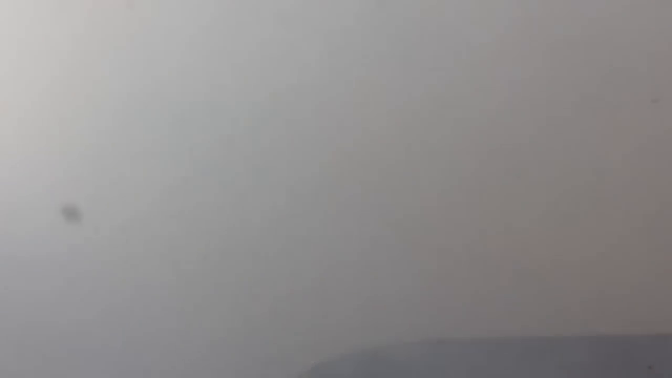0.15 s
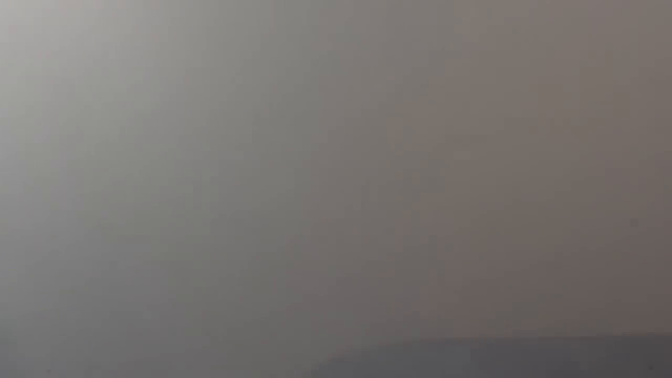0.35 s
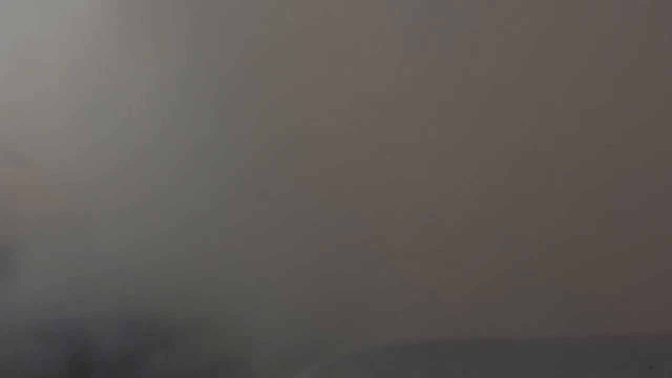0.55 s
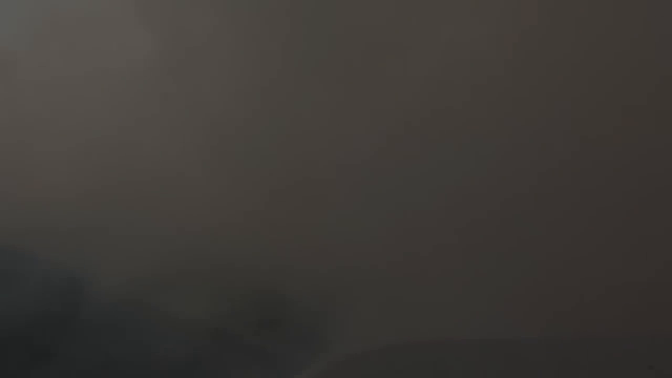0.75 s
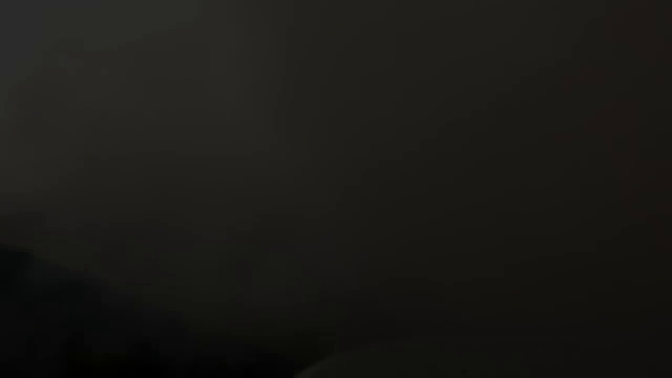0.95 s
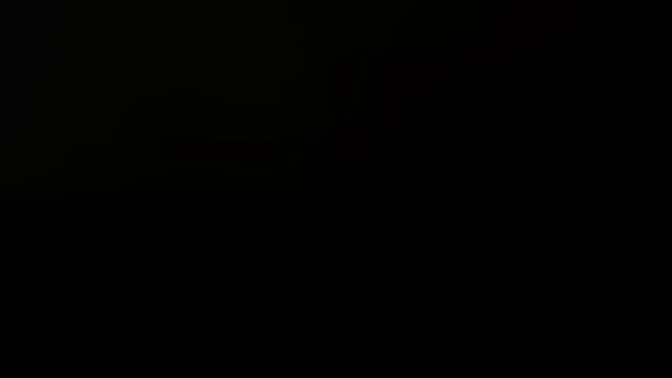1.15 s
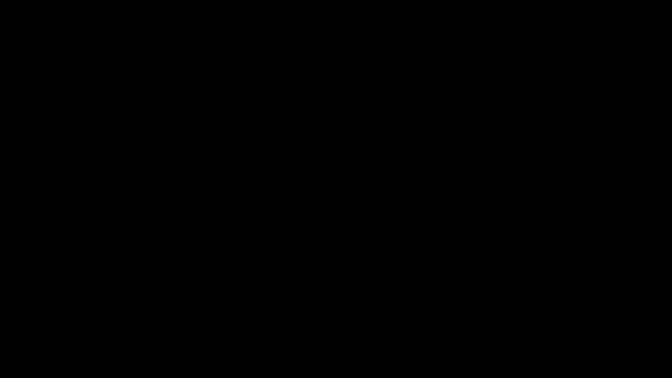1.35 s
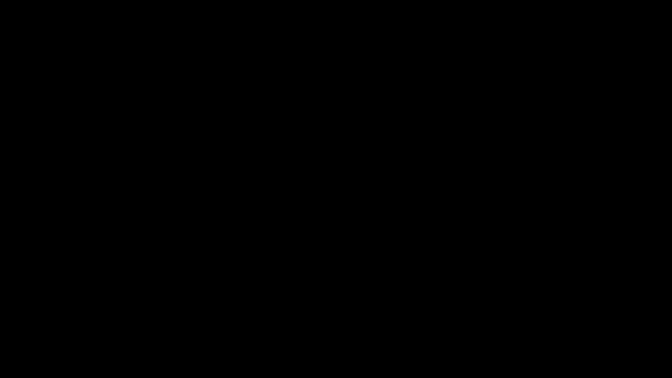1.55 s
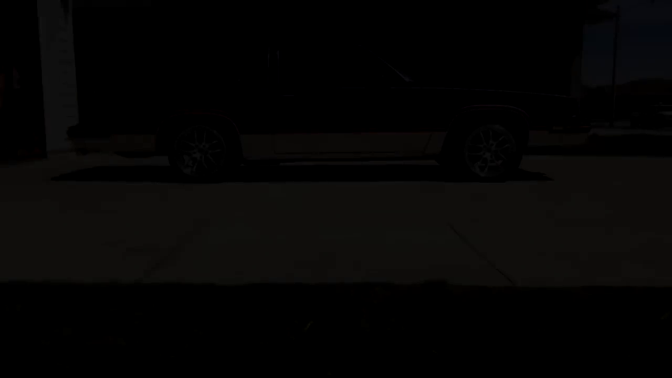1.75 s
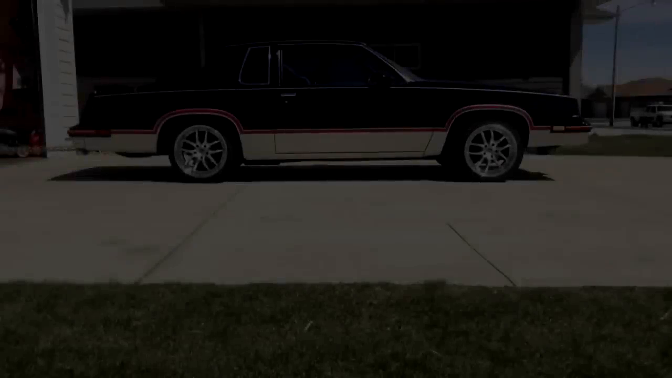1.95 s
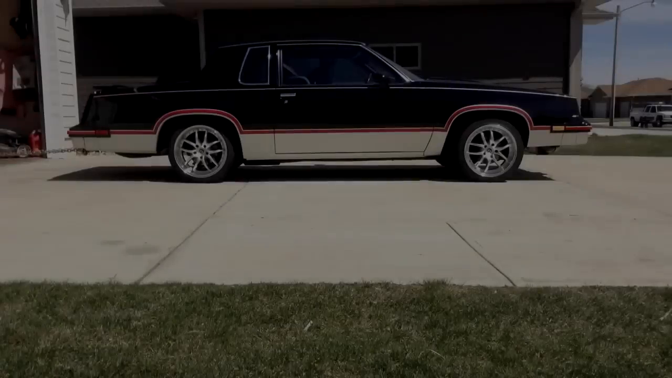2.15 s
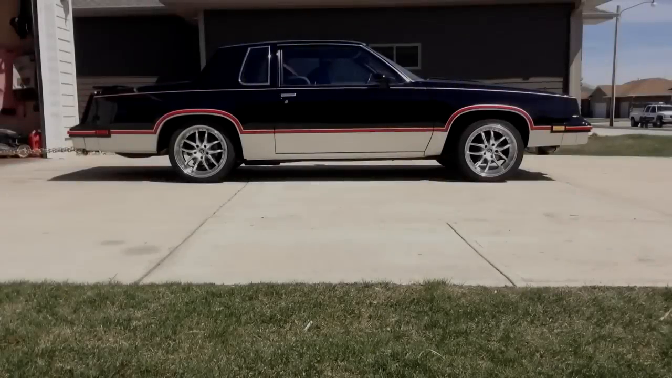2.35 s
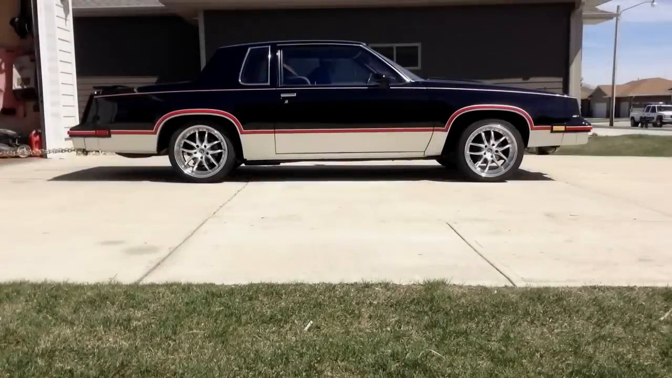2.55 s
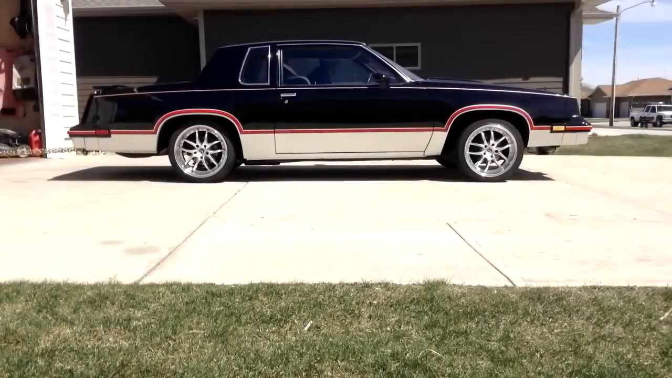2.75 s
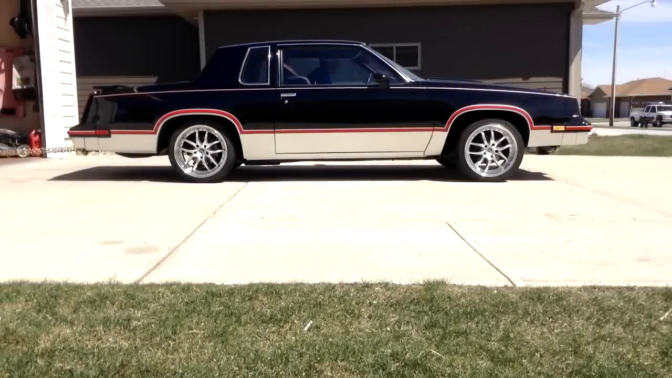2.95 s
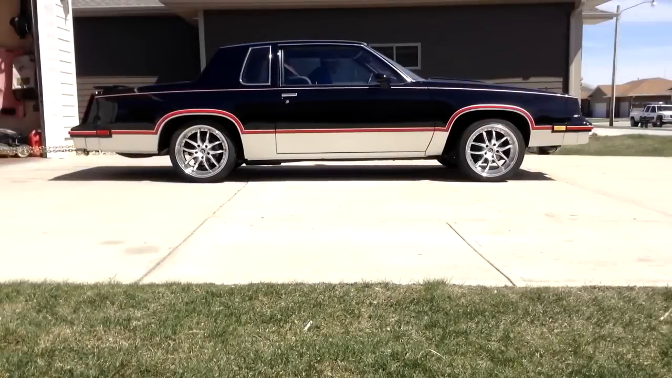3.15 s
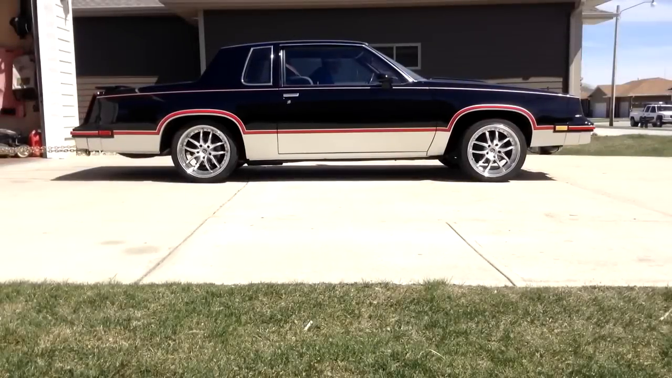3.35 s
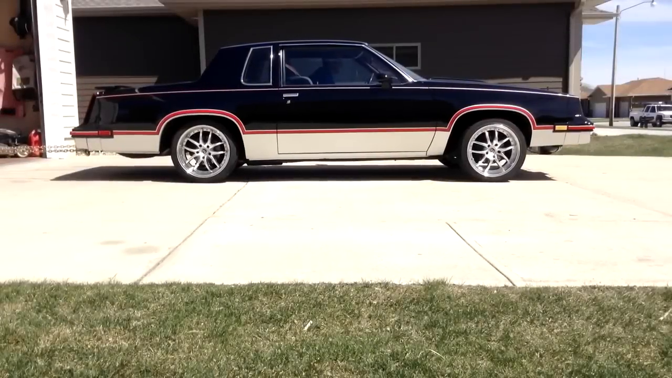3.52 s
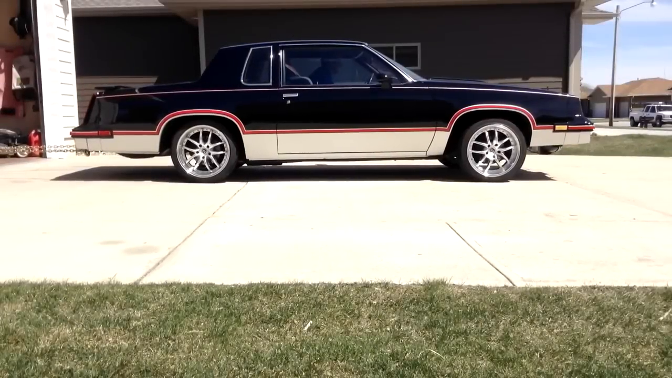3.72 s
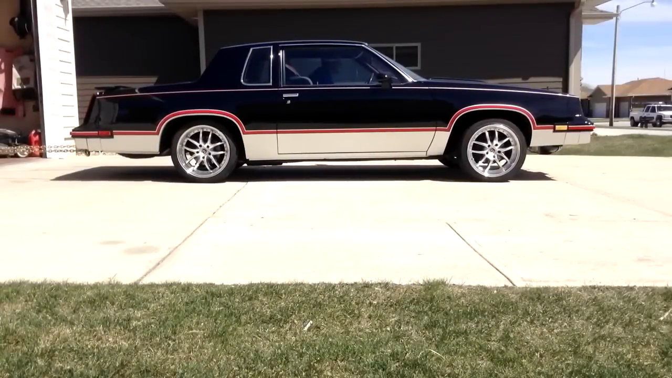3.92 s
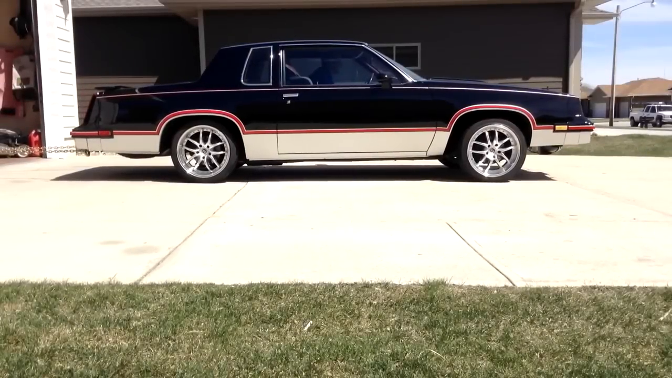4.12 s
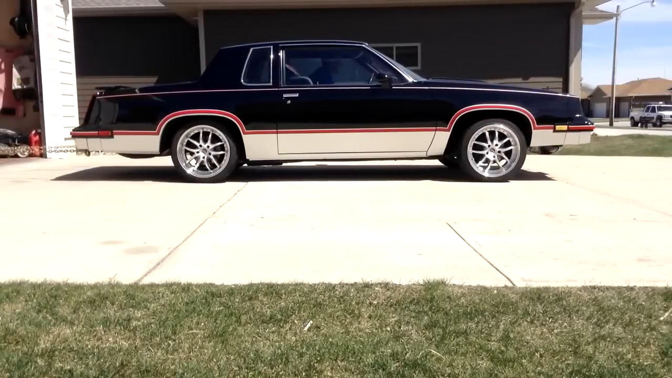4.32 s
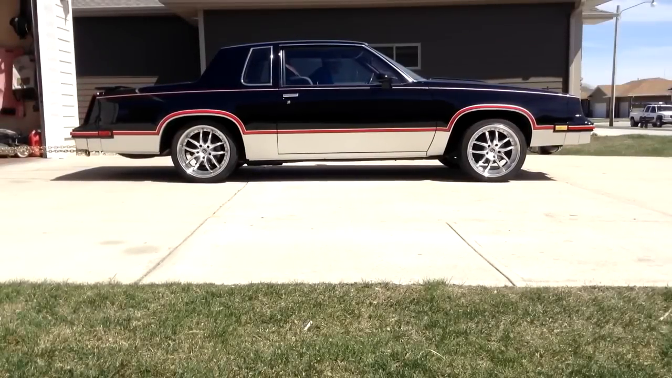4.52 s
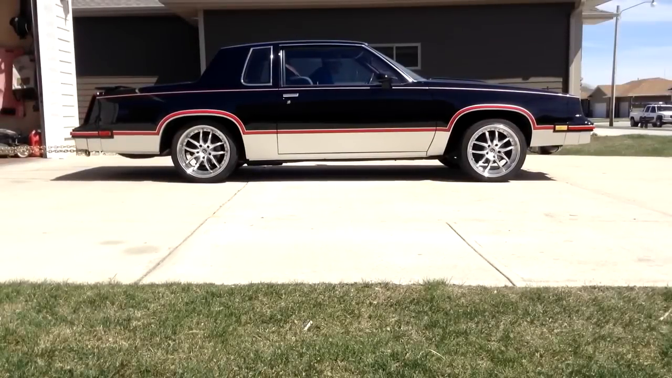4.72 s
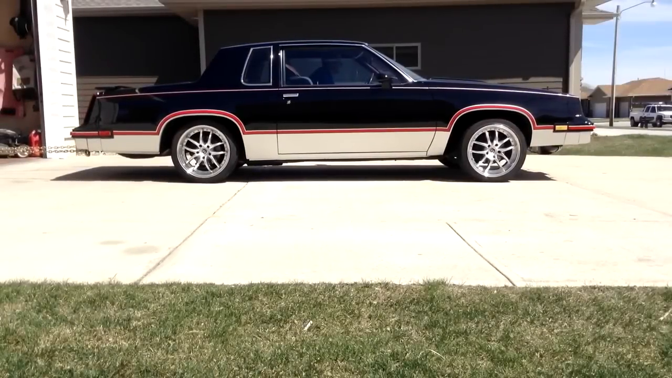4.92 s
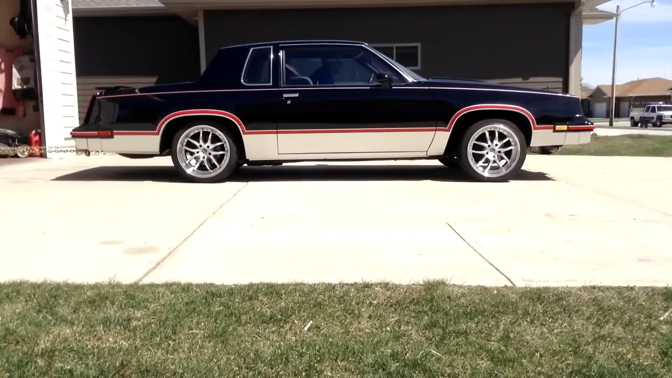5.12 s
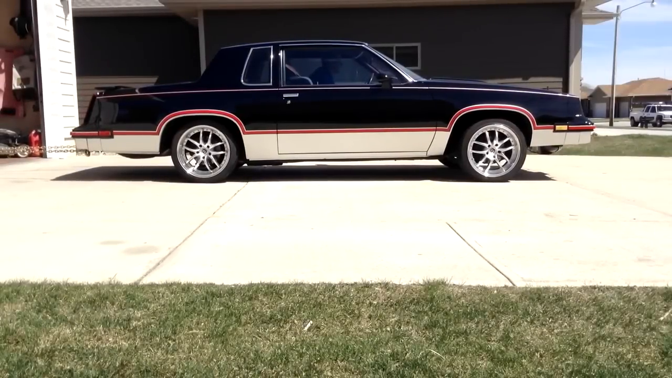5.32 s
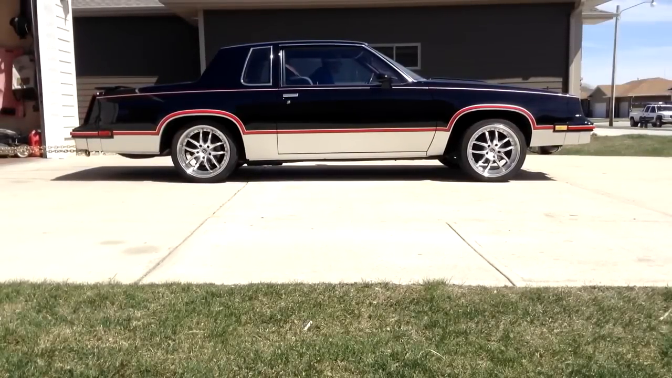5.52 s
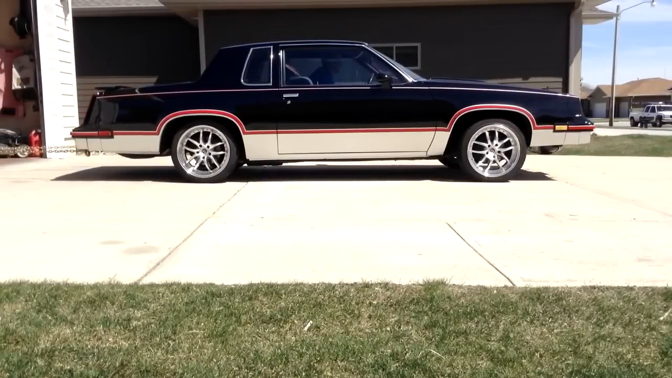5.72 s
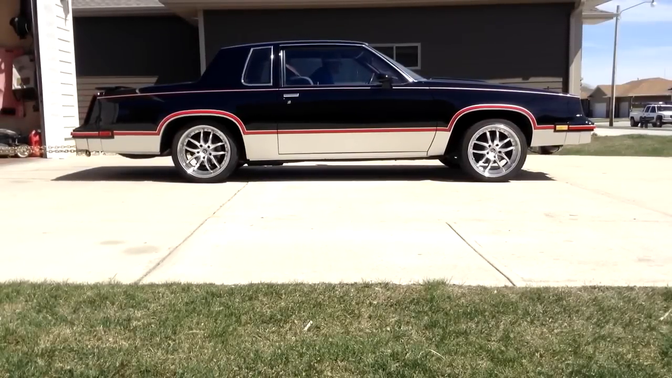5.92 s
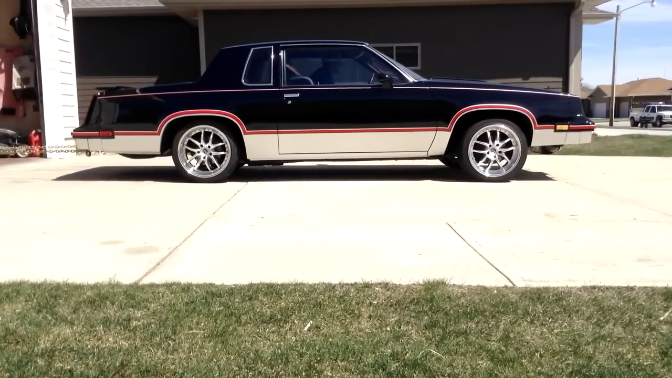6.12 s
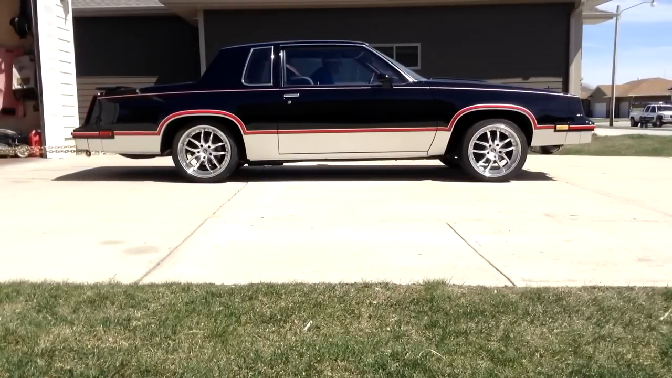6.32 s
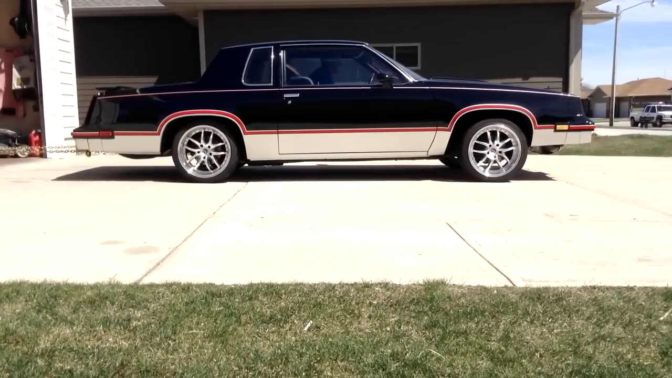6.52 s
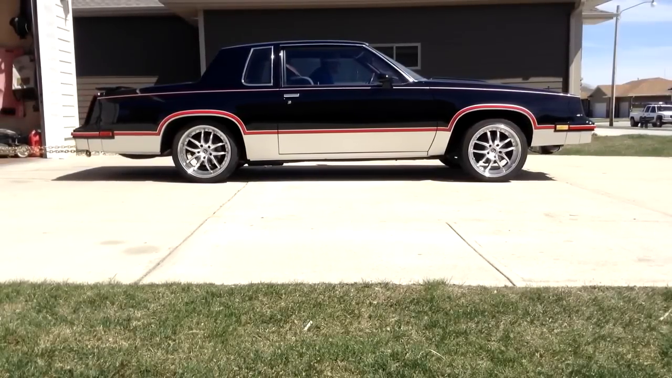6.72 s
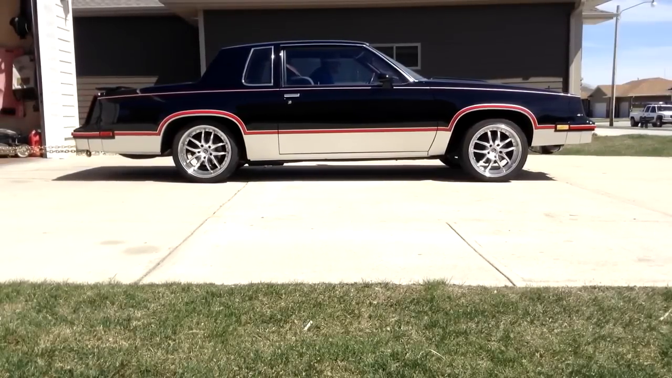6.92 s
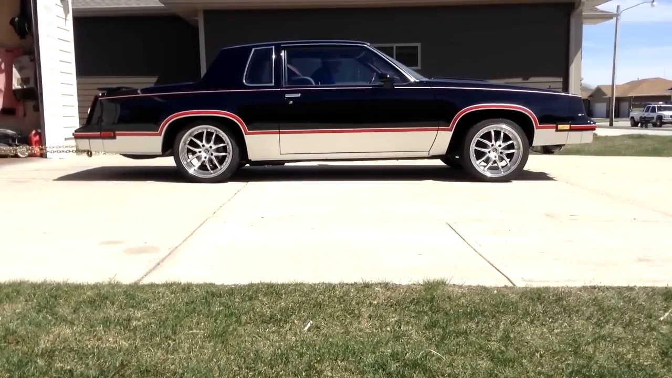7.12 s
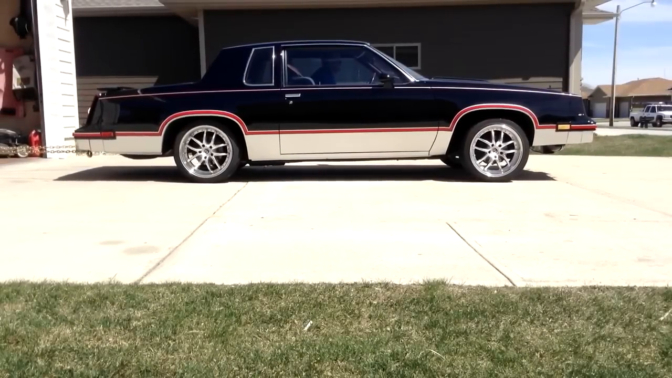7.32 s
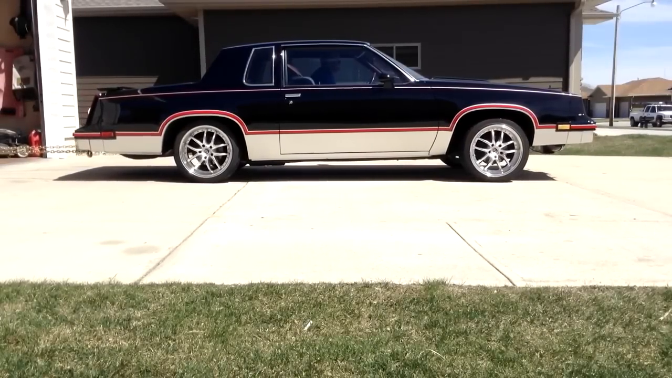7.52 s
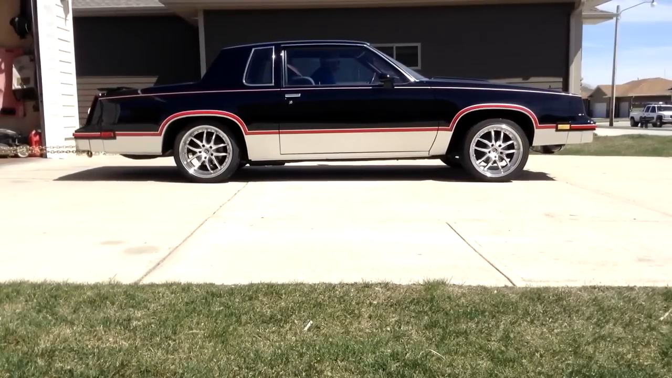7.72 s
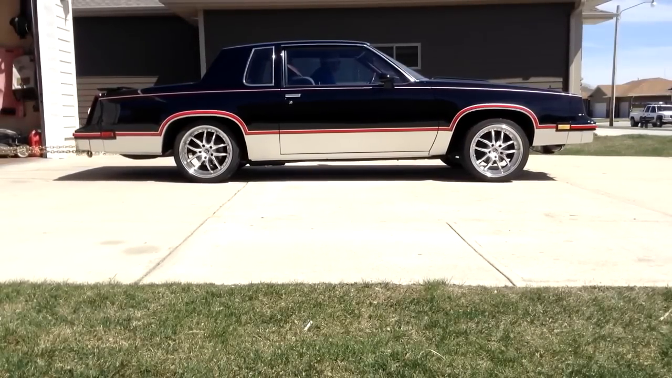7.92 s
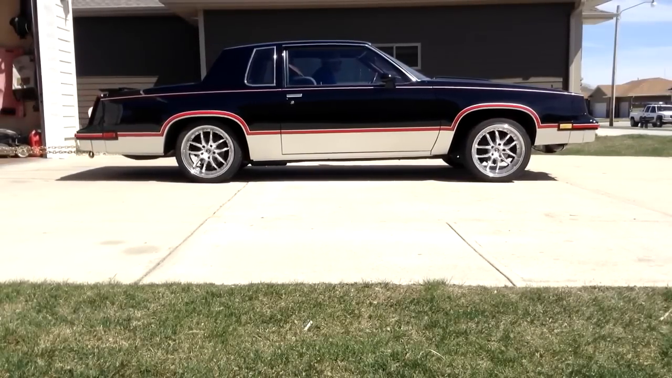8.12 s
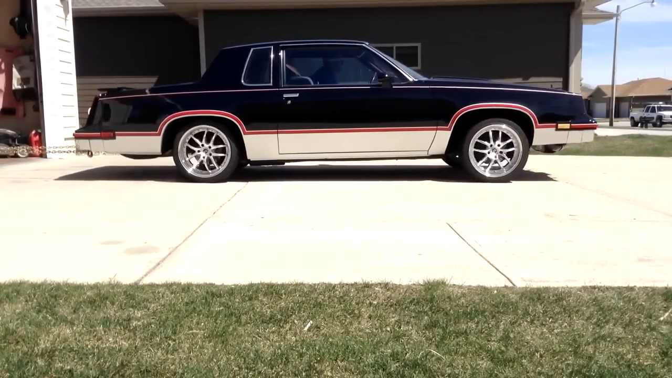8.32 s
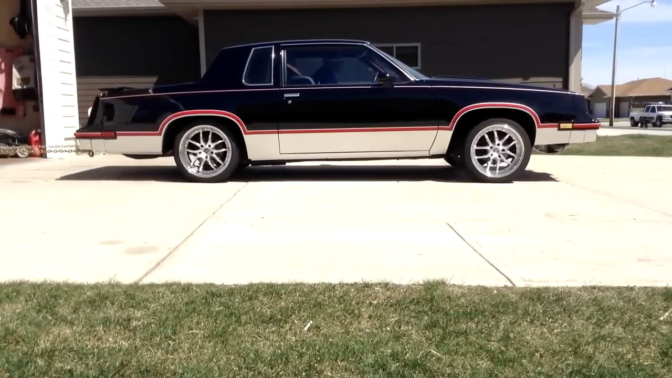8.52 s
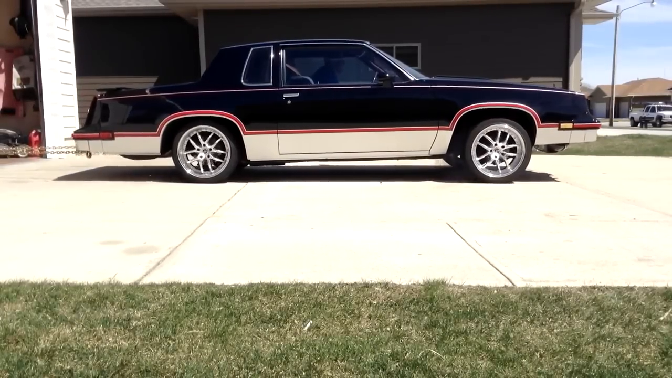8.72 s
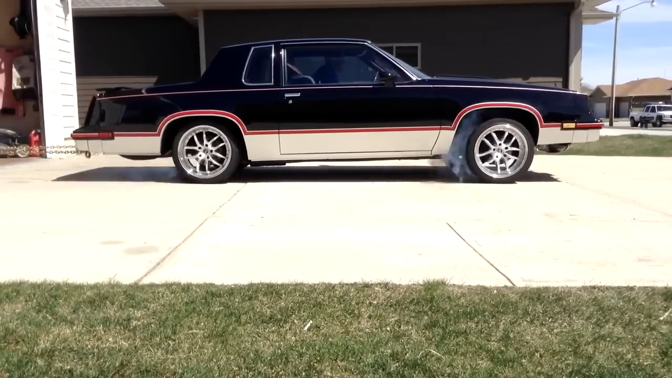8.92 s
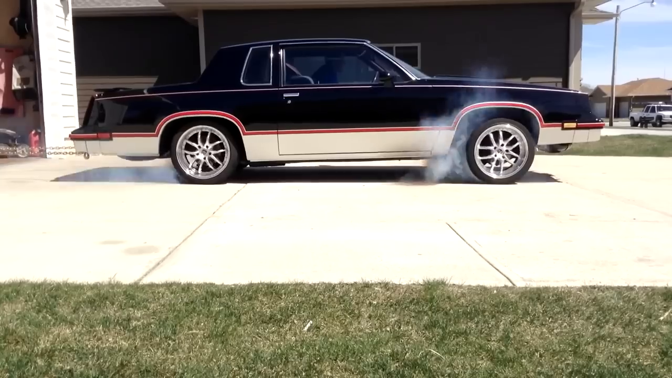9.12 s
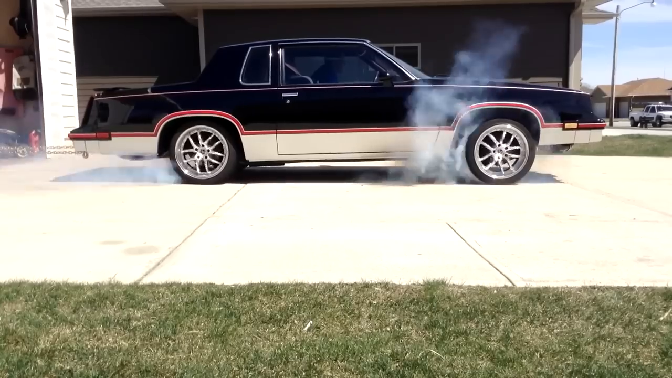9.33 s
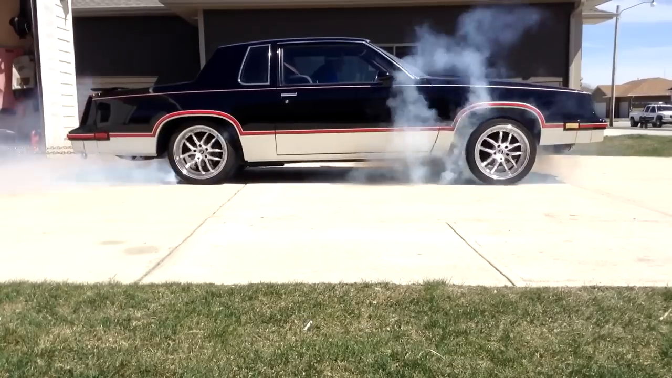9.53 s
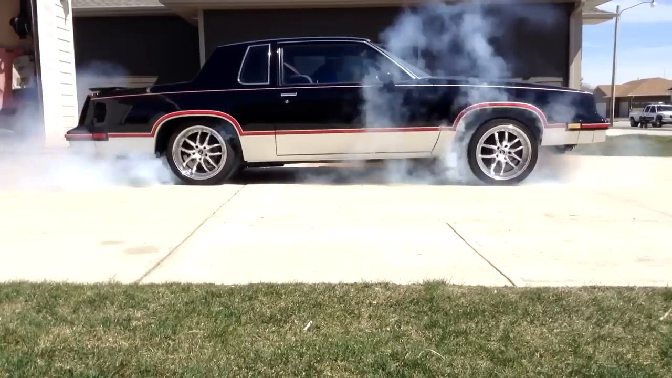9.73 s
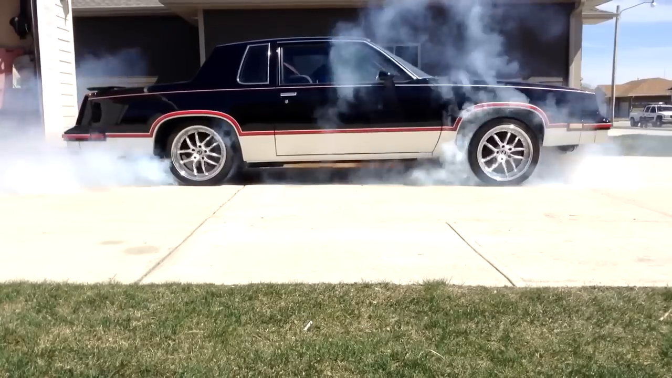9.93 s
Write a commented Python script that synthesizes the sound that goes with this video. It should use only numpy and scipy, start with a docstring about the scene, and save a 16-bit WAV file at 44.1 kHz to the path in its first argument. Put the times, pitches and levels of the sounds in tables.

```python
"""A V8 engine heard from two places by one mono microphone, its firings ringing resonances of the exhaust.
First, near the tailpipe, it coasts down and lopes over shaped yard noise, with a whine falling in pitch.
Then, from across a driveway, it idles, is loaded against the brake in steps and revs until the rear tyres
break loose: firing tones, lope and puffing noises, with whistles and squeals of noise in narrow resonances.
The converter clips the loudest peaks."""
import sys
import numpy as np
from scipy import signal
from scipy.io import wavfile
from scipy.ndimage import uniform_filter1d

SR = 44100
rng = np.random.default_rng(int(sys.argv[2]) if len(sys.argv) > 2 else 0)


def file_out(sig):
    """Save sig as 16-bit WAV at sys.argv[1]."""
    # one column per channel
    cols = np.atleast_2d(sig).T
    # limit, then scale
    lim = np.clip(cols, -1, 1)
    pcm = np.round(lim * 32767).astype(np.int16)
    wavfile.write(sys.argv[1], SR, pcm)


N = 439236  # samples

# Near the tailpipe. Engine speed while coasting: t/s, engine cycles per second/Hz
COAST_SPEED = [(0, 16.2), (.1, 15.2), (.2, 12.9), (.44, 12.4), (.6, 10.4), (.9, 9.4), (1.572, 10.1)]
# Exhaust level up close: t/s, level/dB
COAST_EXHAUST = [(0, -13.5), (.22, -11.5), (.49, -13.5), (.52, -18.5), (.9, -17), (1.4, -21.5),
                 (1.55, -17.5), (1.572, -16)]
# The burble breaks off and catches again: t/s, depth/dB, sinking time/s
LULLS = [(.204, 5, .15), (.832, 18, 0.062), (1.04, 7.5, .17), (1.14, 17, 0.041), (1.272, 15, 0.063),
         (1.362, 32, 0.019)]
CATCH_S = 0.025  # time to catch again
# Resonances of the pipe up close: f/Hz, width/Hz, level/dB
PIPE_NEAR = [(76.3, 24, 4), (112, 48, -4.5), (163, 66, -3), (222, 27, -12.5), (348, 79, -25.5)]
# Colours of the dull yard noise and of its treble: f/Hz, relative level/dB
YARD_COLOUR = [(150, -39), (250, -12.5), (284, -10), (380, -18), (1230, -26), (1460, -24.5), (1900, -27),
               (2460, -26), (4000, -44.5), (5200, -75), (8800, -120)]
YARD_TREBLE_COLOUR = [(2060, -26), (3500, -4), (4520, -12.5), (8010, -13.5), (9360, -15), (10900, -26.5),
                      (13900, -31), (15500, -32)]
# Levels the yard noises settle to after the rev; how far above them they start, and how fast they settle
YARD_DB, TREBLE_DB, AFTER_REV_DB, SETTLE_S = -39, -52.5, 14.5, 0.37
# Driveline whine running down: t/s, f/Hz, level/dB
FALLING_WHINE = [(.2, 2900, -57), (.6, 2420, -55), (1, 2020, -55), (1.3, 1700, -54), (1.55, 1480, -57)]
# Partials of the whine: pitch ratio/1, relative level/dB
WHINE_PARTS = [(1, 0), (.7, 0), (1.33, -6)]
# Short squeak: t/s, f/Hz, level/dB
SQUEAK = [(1.1, 2700, -48), (1.19, 2470, -40), (1.38, 2340, -48)]
# One dull knock and its main pitch: t/s, level/dB, f/Hz
KNOCK = (1.463, -21, 650)

# Strength of the eight firings, the near bank louder: level/dB
CYLINDERS_DB = [1.5, -12, -28, -3.5, -22.5, -6.5, 1, -8.5]
# Echoes of house and ground: delay/ms, level/dB
WALLS = [(21, -9), (47, -9)]

# Across the driveway. Engine speed: t/s, engine cycles per second/Hz
DRIVEWAY_SPEED = [(1.57, 6.2), (2.2, 5.92), (2.5, 6.12), (2.85, 6.12), (3.0, 6.85), (3.33, 9.9),
                  (3.62, 10.62), (4.35, 9.95), (5.0, 10.73), (5.6, 11.0), (5.87, 11.4), (6.18, 12.95),
                  (6.45, 12.78), (6.85, 12.82), (7.18, 15.2), (7.36, 15.6), (7.85, 14.9), (8.02, 15.8),
                  (8.25, 23.5), (8.85, 37.8), (9.1, 39.9), (9.7, 49.0), (9.96, 50.84)]
# Effort of the engine, which leads the roar, and the hiss: t/s, effort/dB, hiss level/dB
EFFORT = [(1.57, -35, -37.5), (2.75, -34, -37.5), (3.15, -32, -32), (3.35, -25.5, -28), (3.75, -27.5, -27),
          (4.1, -28, -29.5), (4.65, -28, -28.5), (5.4, -26.5, -26.5), (5.8, -26.5, -26.5),
          (5.98, -23.5, -23), (6.74, -23, -23.5), (7.23, -19.5, -17.5), (7.55, -20.5, -18.5),
          (7.9, -20, -19.5), (8.09, -16, -18), (8.17, -13.5, -22), (8.38, -12.5, -20.5), (8.62, -10.5, -20),
          (8.78, -9.5, -13), (9.3, -12.5, -8.5), (9.96, -13, -8.5)]
# Share of the noise that spinning tyres make: t/s, share/1
SLIP = [(8, 0.018), (8.5, 0.4), (8.9, 0.64)]
# How well the exhaust passes a firing tone: f/Hz, level above the effort/dB
TONE_PATH = [(48, -35), (62, -6), (76, -11), (84, -0.5), (97, -6), (103, -22), (122, 3.5), (160, 0),
             (172, -9), (207, 3), (245, -23), (265, -29), (310, -5), (345, -20), (395, -19), (430, -46),
             (520, -31), (620, -62), (800, -32)]
OCTAVE_DB = -2  # added to the path's level for the octave of the firing tone
# Lope against engine speed: engine cycles per second/Hz, level above the effort/dB
LOPE_BY_SPEED = [(6, 4), (10, 5), (10.6, 6.5), (11.6, 10), (12.9, 5.5), (15, 3), (28, 2), (38, -7),
                 (43, -17.5), (51, -21)]
# Resonances of the exhaust from afar, when revved, and of its upper modes: f/Hz, width/Hz, level/dB
PIPE_FAR = [(91.4, 13, -14), (131.4, 20.5, -3), (156, 19.4, 4.5), (171.4, 62, -5), (209.2, 31, -1),
            (283, 29, -18.5)]
PIPE_REVVED = [(141, 43, -25), (205, 52, -3), (223, 62, -11)]
PIPE_UPPER = [(313.6, 42, -8), (412.5, 44, 0.5), (532, 103, -2.5), (743, 157, 3), (905, 240, -2),
              (1073, 170, -2.5)]
# Colours of the roar at idle, under load and with the tyres spinning: f/Hz, relative level/dB
ROAR_IDLE = [(140, -45), (240, 1), (280, 10.5), (318, -8.5), (417, -0.5), (509, -16), (557, -6), (961, -5),
             (1120, -5), (1400, -10), (1820, -42), (3080, -120)]
ROAR_LOADED = [(140, -5), (240, -0.5), (300, -2.5), (339, -4.5), (408, 0), (502, -13.5), (669, -4),
               (764, -5), (1030, -11), (1110, -14), (1230, -24), (1400, -17), (1820, -32), (3080, -120)]
ROAR_REVVED = [(15, -54), (25, -1), (118, -35), (137, -31), (192, -26), (278, -8), (423, -2), (613, -7),
               (726, -10), (1160, -5), (1400, -3), (1820, -9), (3080, -120)]
# Colours of the clatter at idle and under load, and of the tyres that replace it: f/Hz, relative level/dB
CLATTER_IDLE = [(710, -42), (1200, -20), (1800, -11), (2540, -7), (3480, -14), (5060, -27), (5500, -16),
                (7150, -40), (12100, -120)]
CLATTER_LOADED = [(710, -22), (1200, 2), (1510, -0.5), (1670, 5), (1860, 3.5), (2640, 0.5), (4030, -17),
                  (5500, -28), (7150, -31), (12100, -120)]
TYRES = [(710, -31), (1200, -23), (1430, -31), (1550, 4), (1980, 3.5), (2680, -5), (3060, 0.5), (5500, -26),
         (7150, -96), (12100, -120)]
# The clatter follows part of the effort from a base level; slip adds the tyres
CLATTER_BASE_DB, CLATTER_FOLLOWS, TYRES_DB = -15, 0.66, 20
# Colours of the hiss without slip and of the tyre hiss: f/Hz, relative level/dB
HISS = [(2650, -1.5), (4500, -4.5), (6080, -4), (7880, -2.5), (10400, -4), (13200, -0.5), (14800, -4),
        (15500, -3)]
TYRE_HISS = [(2650, -1.5), (4500, -3.5), (13500, -10.5), (14700, -12), (15500, -28)]
# Ringing panels and castings: f/Hz, width/Hz, level against the clatter/dB
CASTINGS = [(886, 64, -8), (1138, 16, -11.5), (1654, 47, -12), (2052, 20, -13), (2244, 23, -13.5),
            (2528, 39, -13), (2733, 21, -12.5), (3197, 42, -20), (4390, 29, -18), (4820, 23, -17),
            (4990, 49, -17)]
# Low howl of the tyres: f/Hz, width/Hz, level against the clatter/dB
HOWL = [(728, 76, -12.5), (1060, 58, -9), (1414, 59, -5), (1843, 15, -15), (2077, 28, -9.5)]
# Rough firings as the throttle catches: t/s, level/dB
RASPS = [(3.254, -27), (3.318, -19), (3.342, -24), (3.375, -26), (3.42, -21)]
# Belt whistle: t/s, level/dB
BELT = [(1.57, -35), (2.76, -36), (2.98, -31), (3.06, -42), (3.2, -41), (3.27, -49), (3.6, -48), (3.9, -54)]
BELT_RATIO = 424  # whistle cycles per engine cycle
# Thin whistles that come and go: t of peak/s, f/Hz, level/dB, rise/s, fall/s
THIN_WHISTLES = [(2.146, 5080, -36, .33, .13), (2.374, 5130, -38, .1, .08), (2.55, 5100, -49, .7, .6),
                 (2.718, 5120, -38, .16, 0.26), (2.078, 9200, -40, .05, 0.2),
                 (2.252, 9150, -43, .02, 0.089), (3.32, 9280, -28.5, .015, 0.1), (3.46, 9250, -39, .06, .3)]
# Lower squeal: t/s, f/Hz, level/dB
LOWER_SQUEAL = [(3.5, 11800, -50), (4.6, 11750, -47), (5.2, 11700, -52), (5.8, 11850, -45),
                (6.3, 12100, -46), (6.9, 12300, -48)]
# Chirps: t/s, level/dB
CHIRPS = [(3.5647, -37), (3.654, -28), (3.7133, -33), (3.7897, -32), (3.8879, -35), (3.9857, -36),
          (4.7879, -35), (4.9391, -34), (5.0239, -31), (5.0832, -34), (5.1431, -35), (5.3406, -32),
          (5.426, -26), (5.5192, -30), (5.5726, -28), (5.6928, -30), (5.9044, -33)]
# High squeal: t/s, f/Hz, level/dB
HIGH_SQUEAL = [(5.92, 13000, -39), (5.96, 13020, -27), (6.7, 13080, -29), (6.9, 13150, -25),
               (7.08, 13300, -27), (7.25, 13500, -36)]
# Ragged cluster the squeal spreads into: t/s, f/Hz, level/dB
CLUSTER = [(6.9, 13400, -40), (7.05, 14100, -31), (7.3, 14500, -30), (7.6, 14400, -33), (7.9, 14500, -31),
           (8.07, 14400, -28.5), (8.14, 14300, -40)]
# Parts of the cluster: pitch ratio/1, width/Hz, relative level/dB
CLUSTER_PARTS = [(1, 140, 0), (.965, 160, -2), (.93, 200, -4), (1.043, 120, -4), (1, 1300, 4)]
# Bursts of hiss as the tyres begin to slip: t/s, level/dB
SPITS = [(8.165, -14.5), (8.2126, -17), (8.253, -16.5), (8.2954, -20), (8.3328, -20), (8.437, -19),
         (8.52, -20)]
SHELF_HZ, EDGE_HZ = 15300, 15682  # treble shelf and band limit


def gain_of(db):
    """Amplitude factor of a level in dB."""
    return 10 ** (np.asarray(db) / 20)


def evened(x):
    """Scales a signal to an overall RMS of 1."""
    return x / np.sqrt(np.mean(x ** 2) + 1e-20)


def read(points, hz):
    """Curve between its points over log frequency; below the first one it falls 24 dB per octave."""
    f, value = np.transpose(points)
    octaves_below = np.maximum(np.log2(f[0] / (hz + 1)), 0)
    return np.interp(np.log(hz + 1), np.log(f + 1), value) - 24 * octaves_below


def columns(rows):
    """First sample of a timed table and its columns at every sample."""
    s, *rest = np.transpose(rows)
    at = np.arange(round(s[0] * SR), min(round(s[-1] * SR), N))
    return at[0], [np.interp(at / SR, s, c) for c in rest]


def add(mix, start, sound):
    """Lays a sound into the mix from a given sample."""
    mix[start:start + len(sound)] += sound


def high_passed(x, hz):
    """Drops the bass below hz."""
    return signal.sosfilt(signal.butter(4 if hz < 100 else 2, hz, "high", fs=SR, output="sos"), x)


def resonate(x, hz, width):
    """Shifts the curve hz down to zero, smooths, and shifts back: a resonance of gain 1."""
    turn = np.exp(2j * np.pi * np.cumsum(hz * np.ones(len(x))) / SR)
    r = np.exp(-np.pi * width / SR)
    return 2 * (turn * signal.lfilter([1 - r], [1, -r], x / turn)).real


def steady(x, size):
    """Divides out the slow level, so that a curve alone sets it."""
    power = uniform_filter1d(uniform_filter1d(x ** 2, size), size)
    return x / np.sqrt(power + 1e-14)


def firings(cycle_hz, rough_db, mean_kept):
    """One click per firing, uneven by cylinder and by chance; mean_kept = share kept of the mean strength."""
    count = np.floor(8 * np.cumsum(cycle_hz) / SR).astype(int)  # eight firings per engine cycle
    cylinders = gain_of(CYLINDERS_DB)
    chance = gain_of(rough_db * rng.standard_normal(4000)[count])
    strength = cylinders[count % 8] * chance - (1 - mean_kept) * cylinders.mean()
    return strength * (np.diff(count, prepend=0) > 0)


def echoed(x):
    """A few delayed copies spread each thump; the microphone drops the deepest bass."""
    echoes = sum(gain_of(db) * np.pad(x, (round(ms * SR / 1000), 0))[:len(x)] for ms, db in WALLS)
    return high_passed(x + echoes, 62.)


def pipe(clicks, modes):
    """The exhaust rings at its modes, each resonance passed twice for dark valleys."""
    out = 0
    for k, (hz, width, db) in enumerate(modes):
        ring = resonate(resonate(clicks, hz, width), hz, 0.88 * width)
        out = out + (-1) ** k * gain_of(db) * ring / np.sqrt(width)  # neighbours in opposite phase
    return out


def noise(size, colour, late_colour, share, patchy_db):
    """Random short-time spectra with drifting patches; one colour turns into the other as share rises."""
    frames, hz = size // 256 + 5, np.fft.rfftfreq(1024, 1 / SR)
    a, b, patches = rng.standard_normal((frames, 513, 3)).T
    patches = evened(uniform_filter1d(uniform_filter1d(patches, size=7, axis=0), size=12, axis=1))
    share = np.clip(share[np.minimum(np.arange(frames) * 256, size - 1)], 0, 1)
    early, late = (evened(gain_of(read(c, hz)))[:, None] ** 2 for c in (colour, late_colour))
    blend = np.sqrt((1 - share) * early + share * late)
    spectra = (a + 1j * b) * blend * gain_of(patchy_db * patches)
    return evened(signal.istft(spectra, nperseg=1024, noverlap=768)[1][:size])


def puffs(clicks, ms, depth):
    """Level that swells at each firing and sinks back."""
    pole = [1, -np.exp(-1000 / (ms * SR))]
    swell = signal.lfilter([1 + pole[1]], pole, abs(clicks))
    return steady(1 + depth * signal.lfilter([1], pole, swell), size=4000)


def whistle(hz, db, width):
    """Noise in a narrow moving resonance: a wavering tone, with its ends faded."""
    tone = resonate(resonate(rng.standard_normal(len(hz)), hz, width), hz, width)
    return gain_of(db) * evened(tone) * signal.windows.tukey(len(hz), min(1, 500 / len(hz)))


def knock(level_db, hz):
    """Two low sines that die away together: one dull knock."""
    t = np.arange(1500) / SR
    tones = np.sin(2 * np.pi * hz * t) + 0.46 * np.sin(2 * np.pi * 440.0 * t)
    return gain_of(level_db - 60 * t / 0.019) * tones


def tailpipe():
    """Coasting engine up close: boomy pipe, dull yard, driveline whine running down, a squeak and a knock."""
    (at, (cycle_hz,)), (exhaust_db,) = columns(COAST_SPEED), columns(COAST_EXHAUST)[1]
    t = np.arange(len(cycle_hz)) / SR
    for s, depth_db, sink_s in LULLS:
        dip = np.interp(t, [s - sink_s, s, s + CATCH_S], [0, 1, 0]) ** 0.79
        exhaust_db = exhaust_db - depth_db * dip
    settling_db = AFTER_REV_DB * np.exp(-t / SETTLE_S)
    yard_db, treble_db = YARD_DB + settling_db, TREBLE_DB + 0.95 * settling_db

    clicks, unchanging = firings(cycle_hz, 4.9, 0.65), 0 * cycle_hz
    gas_flow = .35 * rng.standard_normal(len(clicks))  # between firings
    turbulent = evened(echoed(clicks)) + gas_flow
    out = gain_of(exhaust_db) * steady(pipe(turbulent, PIPE_NEAR), size=1200)
    yard = noise(len(out), YARD_COLOUR, YARD_COLOUR, unchanging, 1)
    out += gain_of(yard_db) * yard * puffs(clicks, 5, .4)
    treble = noise(len(out), YARD_TREBLE_COLOUR, YARD_TREBLE_COLOUR, unchanging, 1)
    out += gain_of(treble_db) * treble

    start, (hz, db) = columns(FALLING_WHINE)
    add(out, start, sum(whistle(ratio * hz, db + part_db, 30.) for ratio, part_db in WHINE_PARTS))
    start, (hz, db) = columns(SQUEAK)
    add(out, start, whistle(hz, db, 99.0))
    s, db, hz = KNOCK
    add(out, round(s * SR), knock(db, hz))
    return at, out * signal.windows.tukey(2 * len(out), .012)[len(out):]  # brief fade at the end


def rasp(level_db):
    """A rough firing: a decaying burst of noise in a broad resonance."""
    burst = evened(resonate(rng.standard_normal(900), 1000., 1700.0))
    return gain_of(level_db - 60 * np.arange(900) / SR / 0.05) * burst


def valve_tick(turns):
    """One valve ticks once a cycle: bright noise swelling at each tick."""
    once_a_cycle = np.diff(np.floor(turns / 8 + .88), prepend=0) > 0
    bright = evened(resonate(rng.standard_normal(len(turns)), 8700., 900.))
    return puffs(1. * once_a_cycle, 8.9, 30.0) * bright


def engine():
    """Even firing gives clean tones, uneven firing the lope; the noises puff with the firings."""
    (at, (effort_db, hiss_db)), (cycle_hz,) = columns(EFFORT), columns(DRIVEWAY_SPEED)[1]
    size, turns = len(cycle_hz), 8 * np.cumsum(cycle_hz) / SR  # turns of the firing tone
    tone_db, octave_db = (effort_db + read(TONE_PATH, k * cycle_hz) for k in (8, 16))
    lope_db = effort_db + read(LOPE_BY_SPEED, cycle_hz)
    slip = np.interp((at + np.arange(size)) / SR, *np.transpose(SLIP))
    clatter_db = CLATTER_BASE_DB + CLATTER_FOLLOWS * effort_db + TYRES_DB * slip ** 1.51

    # less even when slow or spinning
    clicks = firings(cycle_hz, .4 + 50. / cycle_hz ** 2 + 1.5 * slip, .15)
    heard, revved = echoed(clicks), np.clip((cycle_hz - 15.5) / 4, 0, 1)
    lope = (1 - revved) * evened(pipe(heard, PIPE_FAR)) + revved * evened(pipe(heard, PIPE_REVVED))
    tones = gain_of(tone_db) * np.sin(2 * np.pi * turns)
    tones += gain_of(octave_db + OCTAVE_DB) * np.sin(4 * np.pi * turns)
    out = np.sqrt(2) * tones + gain_of(lope_db) * steady(lope, size=6000)

    # the colours change as the throttle opens
    idle = np.arange(size) < np.argmax(cycle_hz > 8)
    roar = np.where(idle, noise(size, ROAR_IDLE, ROAR_IDLE, slip, 1.1),
                    noise(size, ROAR_LOADED, ROAR_REVVED, slip, 1.6))
    clatter = np.where(idle, noise(size, CLATTER_IDLE, CLATTER_IDLE, slip, 1.3),
                       noise(size, CLATTER_LOADED, TYRES, slip, 1.6))
    # at full throttle the upper pipe modes bark
    bark = steady(pipe(high_passed(heard, 170.), PIPE_UPPER), size=6000)
    out += gain_of(effort_db - 10 + 8 * slip) * bark
    out += gain_of(effort_db + 0.5 - 2.6 * slip) * roar * puffs(clicks, 5.6, 0.14)
    out += gain_of(clatter_db - 1.25) * clatter * puffs(clicks, 4.2, 0.35)
    out += gain_of(hiss_db) * noise(size, HISS, TYRE_HISS, slip, 1.34) * puffs(clicks, 9.0, 1.0)

    # panels and castings ring at their own pitches; the tyres add a low howl
    one = np.ones(size)
    ringing = sum(whistle(hz * one, db, width) for hz, width, db in CASTINGS)
    out += gain_of(clatter_db - 20.0 * slip) * ringing
    howl = sum(whistle(hz * one, db, width) for hz, width, db in HOWL)
    out += slip * gain_of(clatter_db) * howl
    out += whistle(60. * one, -53. + 3. * slip, 53.0)  # distant low rumble
    for s, db in RASPS:
        add(out, round(s * SR) - at, rasp(db))
    out += gain_of(hiss_db - 9.8 - 7 * ~idle - 20 * slip) * valve_tick(turns)
    return at, out * np.minimum(np.arange(size) / (0.0023 * SR), 1)  # brief fade-in


def thin_whistles():
    """Narrow tones that swell and fade, and the belt whistle, which keeps pace with the engine."""
    out = np.zeros(N)
    at, (db,) = columns(BELT)
    hz = BELT_RATIO * columns(DRIVEWAY_SPEED)[1][0][:len(db)]
    add(out, at, whistle(hz, db, 130.0))
    for s, hz, db, rise_s, fall_s in THIN_WHISTLES:
        at, (level_db,) = columns([(s - rise_s, db - 20), (s, db), (s + fall_s, db - 19)])
        add(out, at, whistle(hz + 0 * level_db, level_db, 40.0))
    return out


def sputter(size):
    """Quick random swings of level."""
    return evened(uniform_filter1d(uniform_filter1d(rng.standard_normal(size), size=400), size=400))


def squeal():
    """High fuzzy tones: chirps over a lower squeal, then a sputter; under more load a ragged cluster."""
    out, one = np.zeros(N), np.ones(1800)
    at, (hz, db) = columns(LOWER_SQUEAL)
    add(out, at, gain_of(3.0 * sputter(len(hz))) * whistle(hz, db, 220.))
    for s, db in CHIRPS:
        add(out, round(s * SR) - 300, np.hanning(1800) * whistle(13000. * one, db, 320.))
    at, (hz, db) = columns(HIGH_SQUEAL)
    add(out, at, gain_of(3.3 * sputter(len(hz))) * whistle(hz, db, 300.))
    at, (hz, db) = columns(CLUSTER)
    for ratio, width, part_db in CLUSTER_PARTS:
        add(out, at, gain_of(2.5 * sputter(len(hz))) * whistle(ratio * hz, db + part_db, width))
    return out


def spits():
    """Short bursts of bright hiss as the tyres begin to slip."""
    out = np.zeros(N)
    for s, db in SPITS:
        bright = evened(resonate(rng.standard_normal(800), 12500., 6400.0))
        add(out, round(s * SR) - 200, gain_of(db) * np.hanning(800) * bright)
    return out


def scene():
    """Near the tailpipe first, then across the driveway; both channels alike."""
    mix = np.zeros(N)
    add(mix, *tailpipe())
    add(mix, *engine())
    mix += thin_whistles() + squeal() + spits()
    return np.array([mix, mix])


def record(dry):
    """The converter clips; then a treble shelf and the band limit."""
    clipped = np.clip(dry, -.93, .93)
    shelf = signal.firwin(2047, SHELF_HZ, window=("kaiser", 7), fs=SR)
    low = signal.oaconvolve(clipped, shelf[None], "same")
    shelved = low + gain_of(-16.) * (clipped - low)
    edge = signal.firwin(2047, EDGE_HZ, window=("kaiser", 9), fs=SR)
    return signal.oaconvolve(shelved, edge[None], "same")


dry = scene()
out = record(dry)
file_out(out)
```